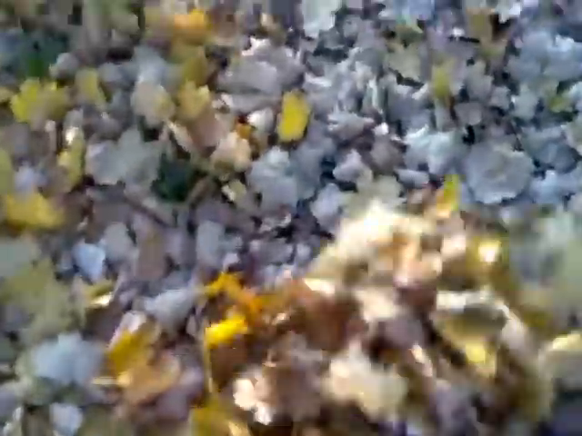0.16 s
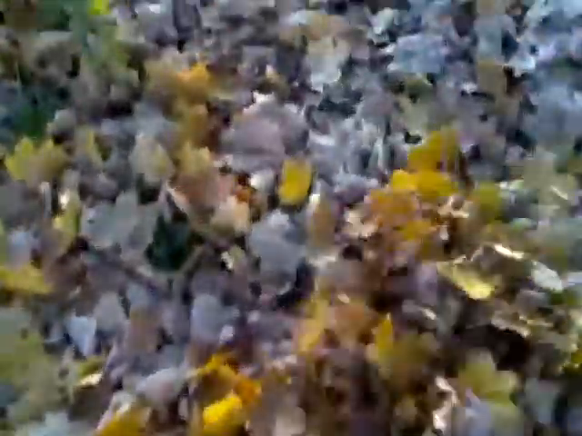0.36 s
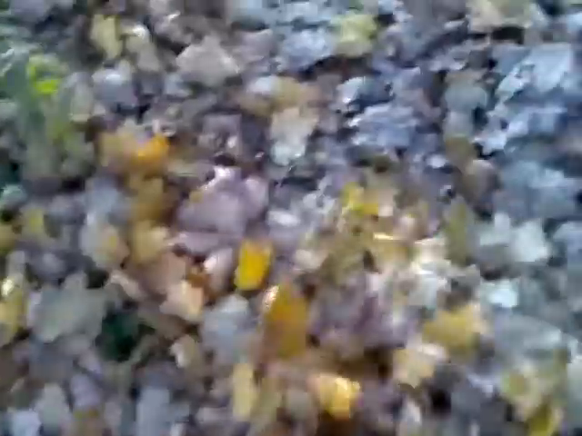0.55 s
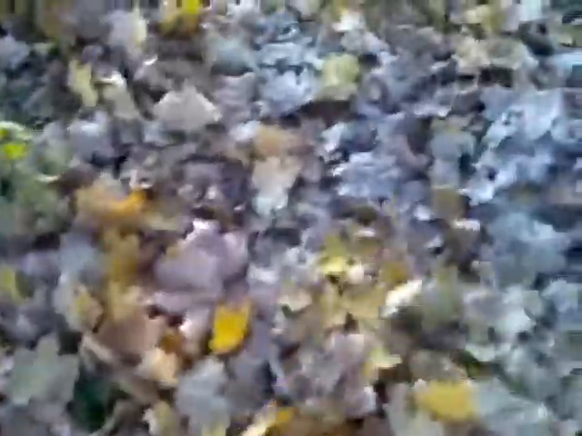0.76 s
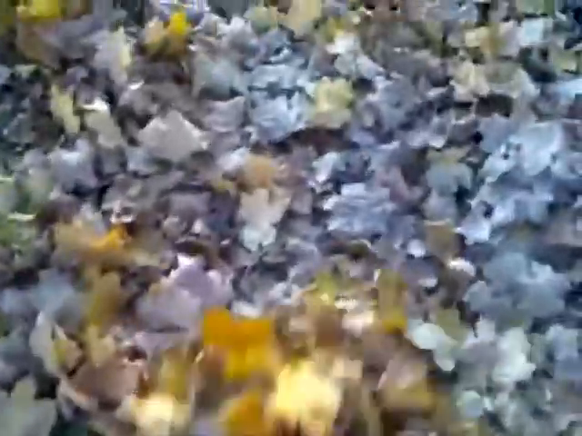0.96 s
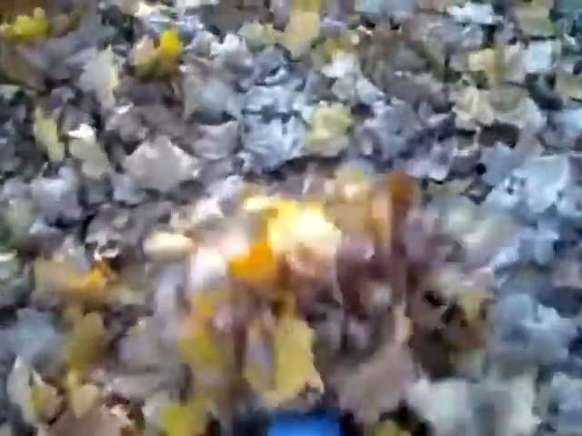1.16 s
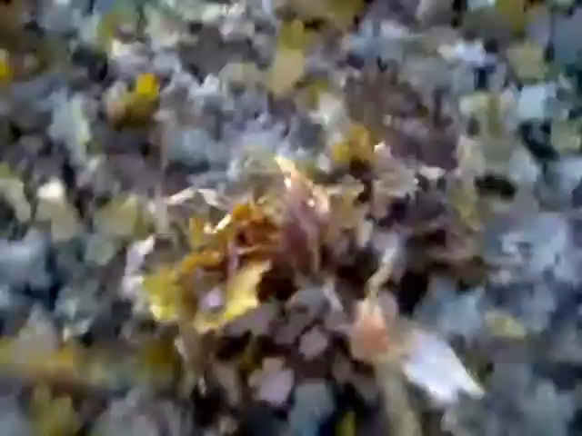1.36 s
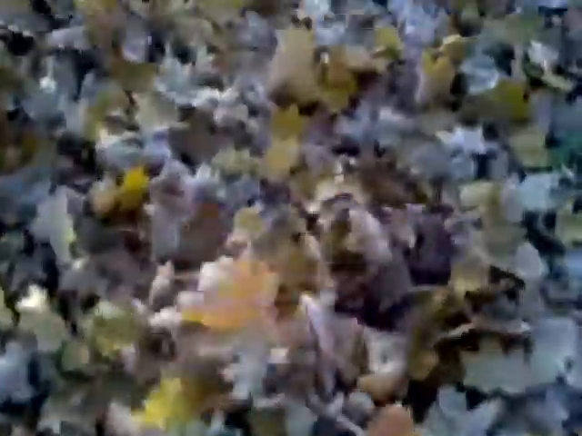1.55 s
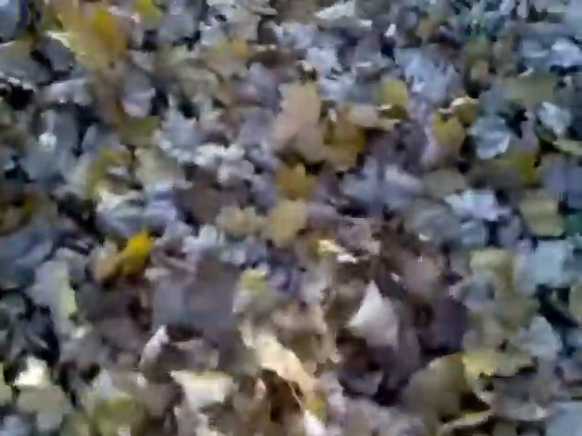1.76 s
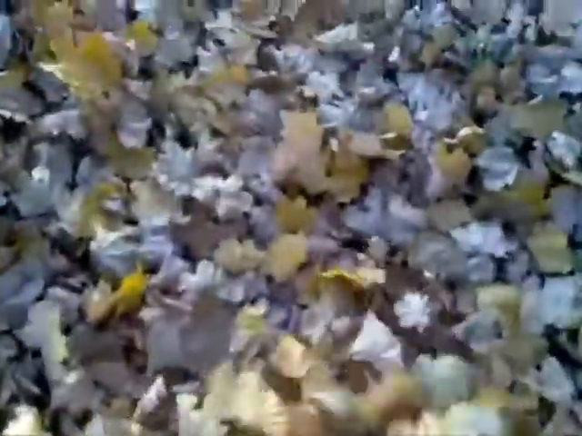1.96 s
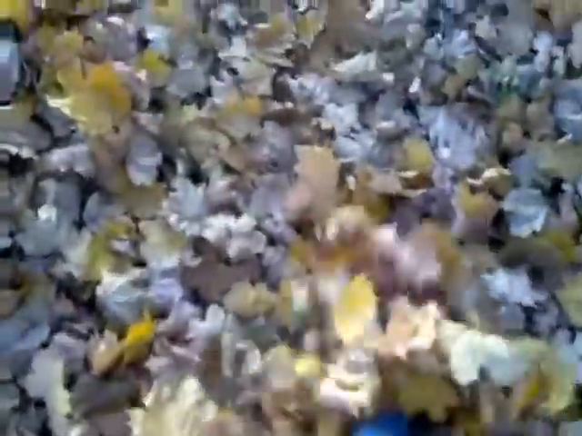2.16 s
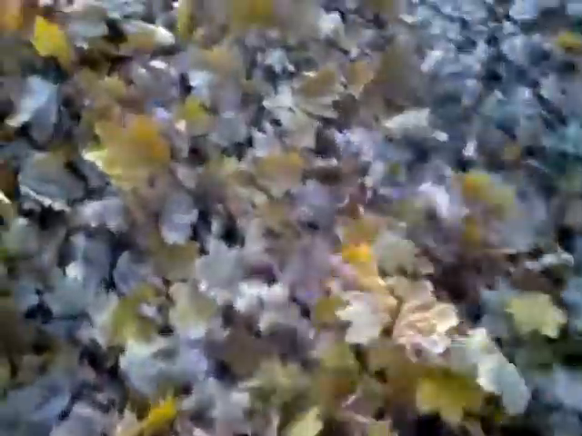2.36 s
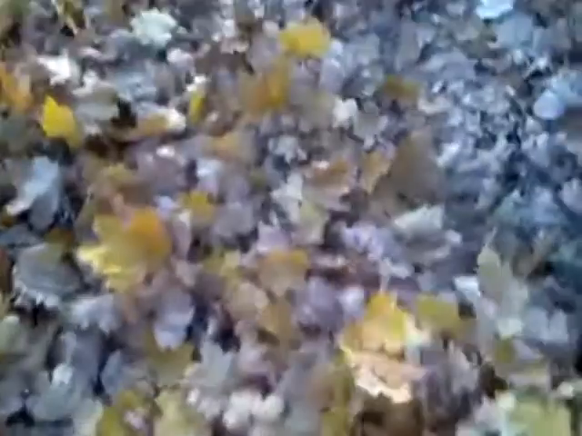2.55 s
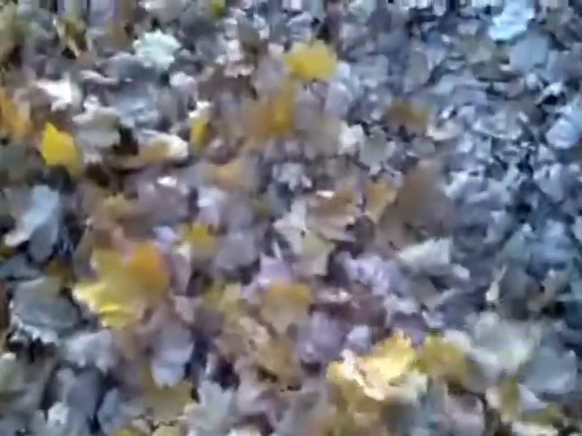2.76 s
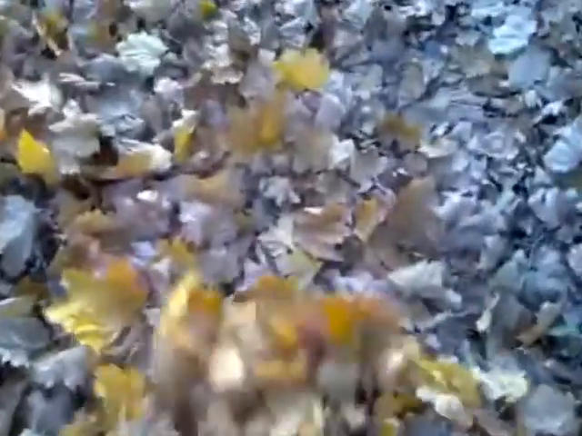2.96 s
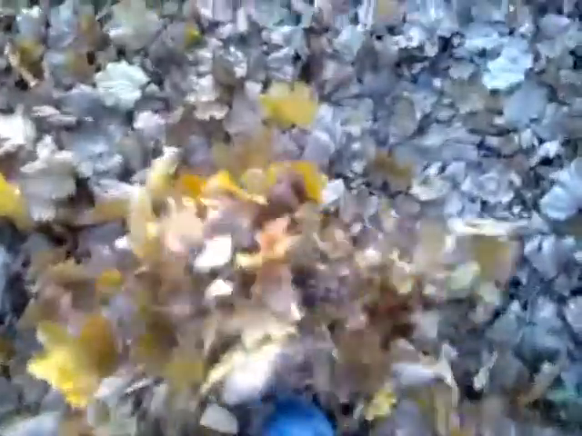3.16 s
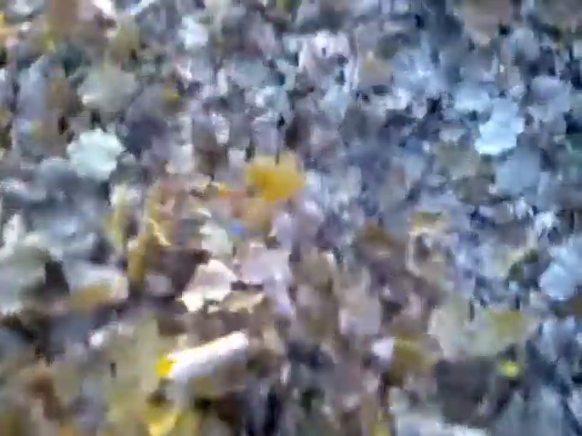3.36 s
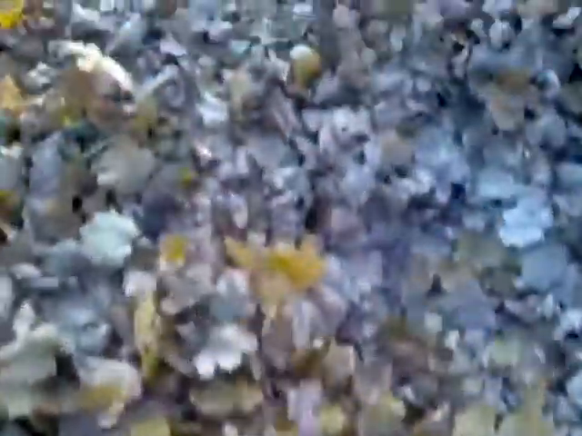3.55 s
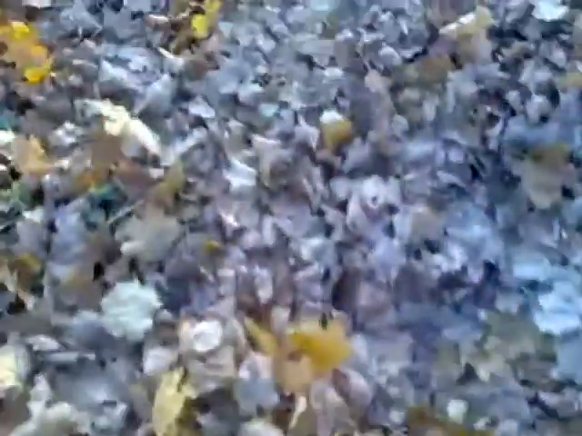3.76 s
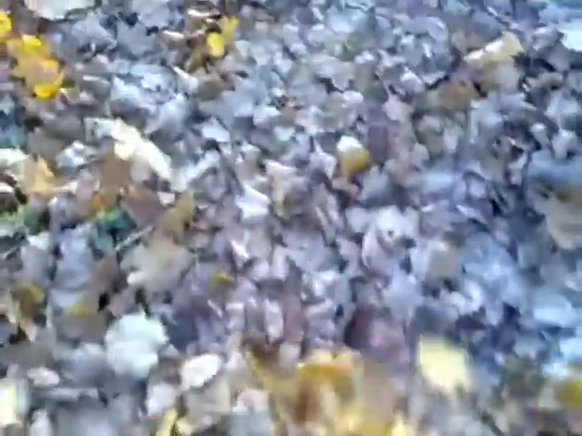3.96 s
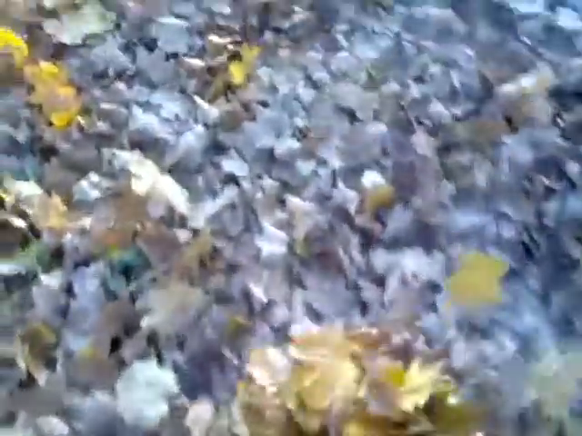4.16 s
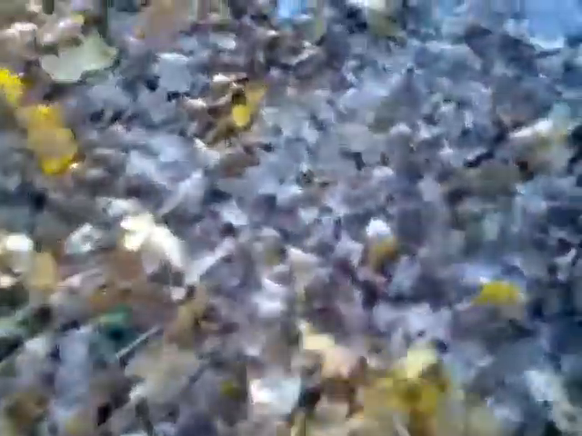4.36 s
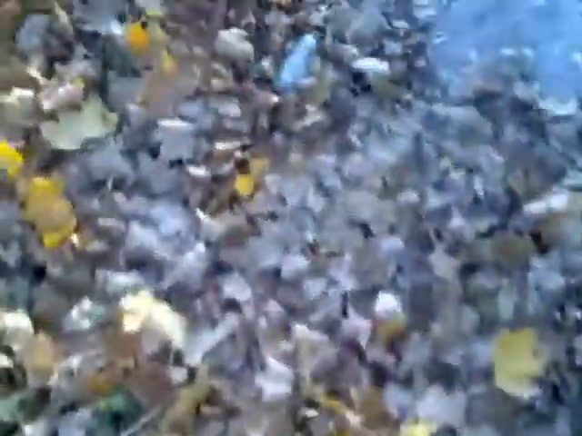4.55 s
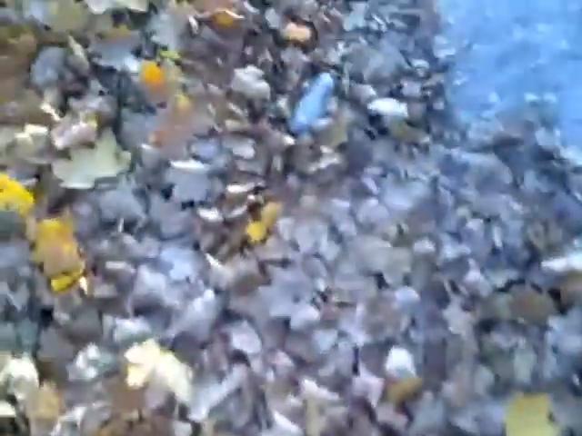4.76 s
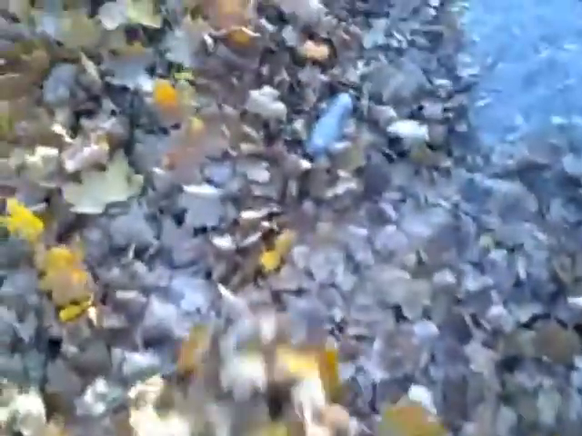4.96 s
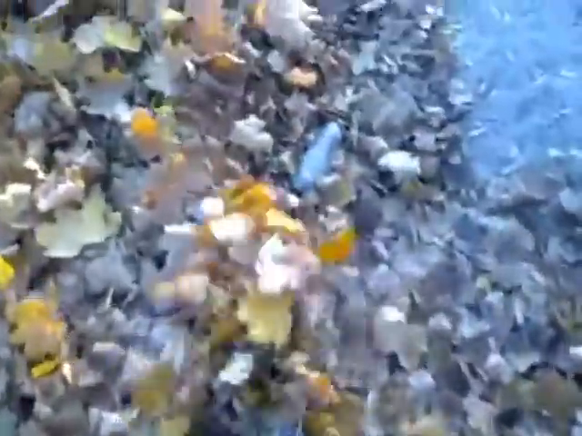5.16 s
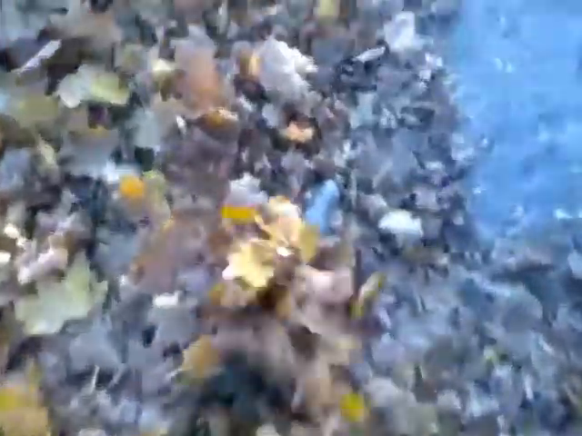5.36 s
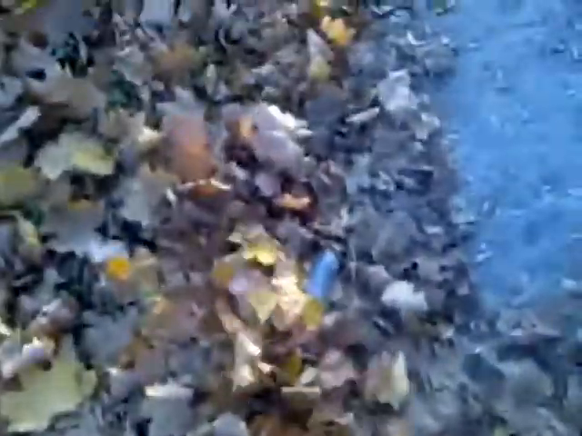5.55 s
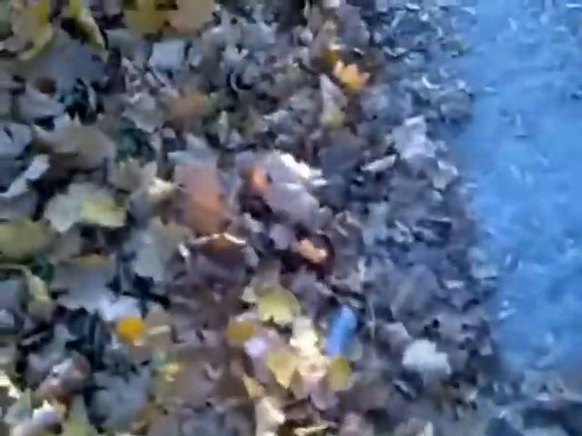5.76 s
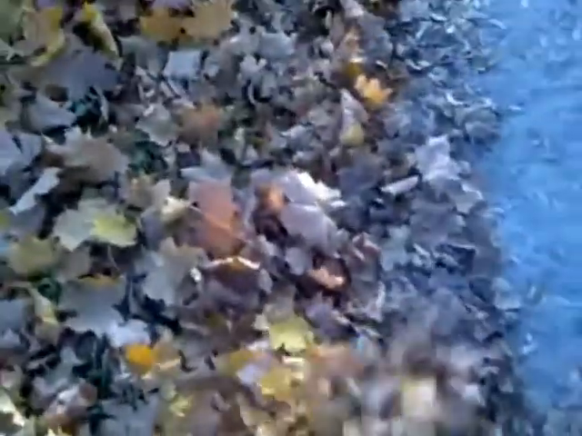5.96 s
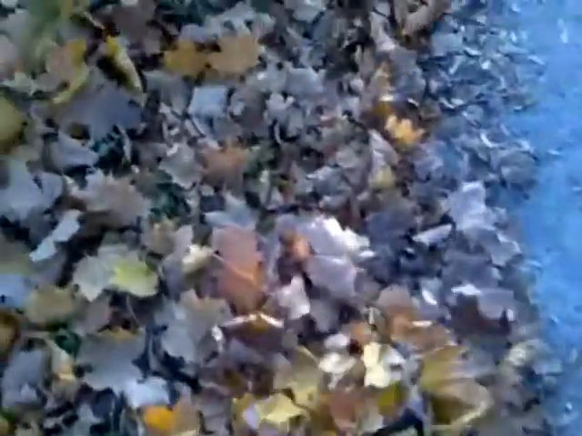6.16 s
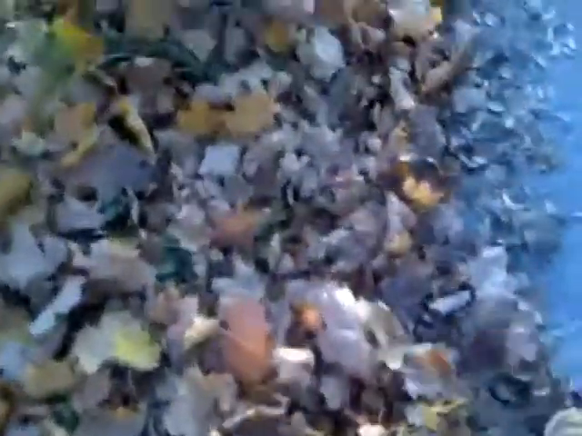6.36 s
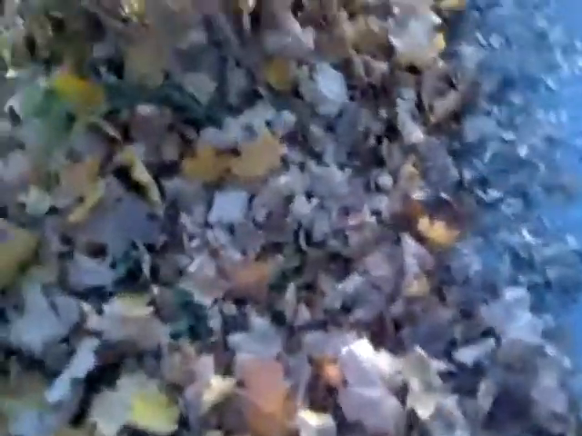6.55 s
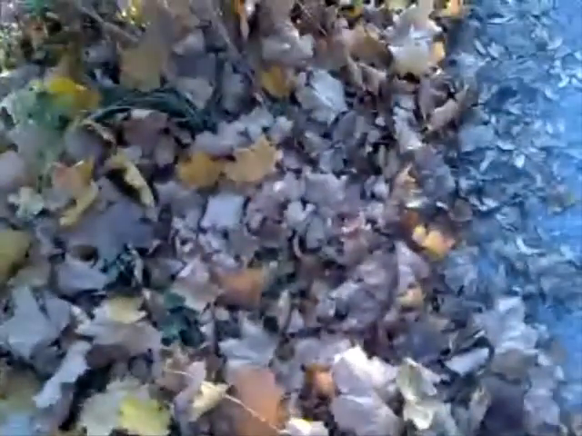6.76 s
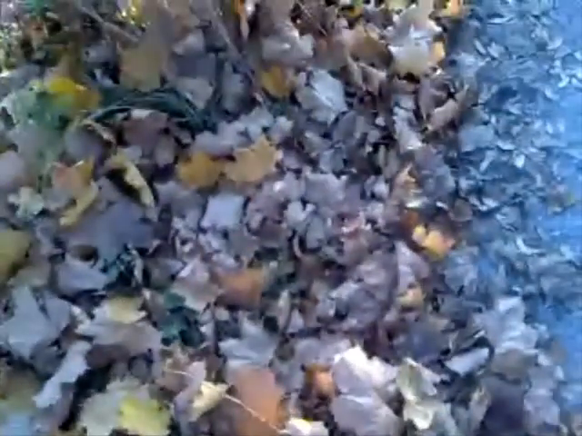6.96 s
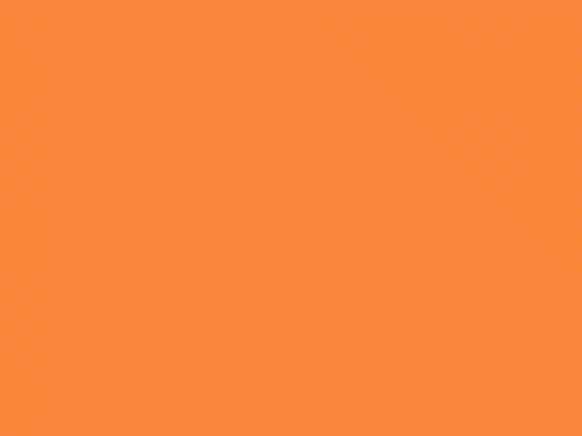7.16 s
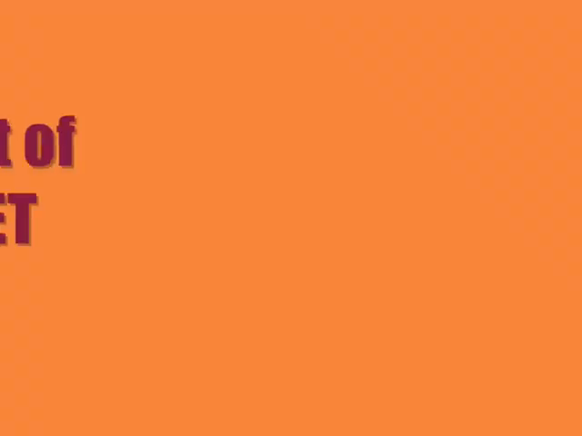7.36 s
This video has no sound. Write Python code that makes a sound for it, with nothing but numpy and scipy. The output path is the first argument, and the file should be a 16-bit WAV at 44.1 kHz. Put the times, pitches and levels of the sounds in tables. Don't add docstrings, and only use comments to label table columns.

```python
import sys
import numpy as np
from scipy import signal
from scipy.fft import rfft, irfft, next_fast_len
from scipy.io import wavfile
from scipy.ndimage import uniform_filter1d

SR = 44100
rng = np.random.default_rng(int(sys.argv[2]) if len(sys.argv) > 2 else 0)


def wav_record(signal):
    frames = np.transpose(np.atleast_2d(signal))
    bounded = np.clip(frames, -1, 1)
    quanta = np.round(bounded * 32767).astype(np.int16)
    wavfile.write(sys.argv[1], SR, quanta)


def volts_from_decibels(level):
    exponent = np.asarray(level, float) / 20
    return 10 ** exponent


N = 325893


def rms_one(x):
    return x / np.sqrt(np.mean(x ** 2) + 1e-20)


def in_time(rows):
    times, levels = np.transpose(rows)
    return np.interp(np.arange(N) / SR, times, levels)


def at_hz(points, hz):
    table_hz, values = np.transpose(points)
    return np.interp(np.log(hz), np.log(table_hz), values)


def band(x, low_hz, high_hz, order=2):
    return signal.sosfilt(signal.butter(order, [low_hz, high_hz], "band", fs=SR, output="sos"), x)


def drift(rate_hz):
    pole = np.exp(-16 * np.pi * rate_hz / SR)
    noise = rng.standard_normal(N // 8 + 4002)
    slow = signal.lfilter([1], [1, -2 * pole, pole * pole], noise)[4000:]
    return np.interp(np.arange(N) / 8, np.arange(len(slow)), rms_one(slow))


# (peak time [s], level [dB], swell over 10 dB [s], fade over 10 dB [s], brightness [dB])
FOOT_SWEEPS = [(0.003, -22, 0.03, 0.077, -4.5), (0.414, -20, 0.29, 0.43, 0), (0.904, -26, 0.12, 0.25, 1),
               (1.432, -19, 0.28, 0.37, 1.5), (1.993, -24.5, 0.16, 0.099, 1),
               (2.521, -21, 0.35, 0.225, 2.5), (2.732, -28, 0.038, 0.21, 2),
               (2.919, -22.5, 0.055, 0.19, 0.5), (3.39, -18.5, 0.25, 0.33, 1),
               (3.909, -23.5, 0.14, 0.098, 2), (4.349, -20.5, 0.27, 0.449, 0.5),
               (4.976, -31, 0.079, 0.076, 1), (5.349, -19, 0.22, 0.33, 2.5), (5.898, -22.5, 0.12, 0.095, 3),
               (6.388, -20, 0.25, 0.21, 2), (6.801, -29.5, 0.064, 0.054, 2),
               (6.91, -35.5, 0.033, 0.027, -1.5), (7.11, -34, 0.02, 0.28, -4)]
# (time [s], level [dB])
SETTLING_LEAVES = [
    (0, -30.5),
    (6.75, -32.5),
    (6.9, -34),
    (7.08, -40),
]


def sweeps():
    t = np.arange(N) / SR
    squareness = 2.54
    power = volts_from_decibels(2 * in_time(SETTLING_LEAVES))
    bright = -1.5 * power
    for peak_s, db, swell_s, fade_s, sweep_bright_db in FOOT_SWEEPS:
        distance = np.abs((t - peak_s) / np.where(t < peak_s, swell_s, fade_s))
        sweep = volts_from_decibels(2 * db - 20 * distance ** squareness)
        power = power + sweep
        bright = bright + sweep_bright_db * sweep
    level_db = 10 * np.log10(power)
    bright_db = bright / power
    slope = uniform_filter1d(np.gradient(level_db) * SR, round(0.03 * SR))
    rising = np.clip(slope, -99, 99)
    body_db = 0.017 * rising - 0.2 * bright_db
    edge_db = 0.55 * bright_db + 0.004 * rising
    crisp_db = bright_db - 0.027 * rising
    return level_db, body_db, edge_db, crisp_db


def cracks(per_s, spread_db):
    sizes = volts_from_decibels(spread_db * np.minimum(rng.exponential(1, N), 5))
    signs = rng.choice([-1, 1], N)
    return rms_one(sizes * signs * (rng.random(N) < per_s / SR))


# (frequency [Hz], level [dB per Hz])
LEAF_COLOUR = [(170, -39.5), (260, -21), (400, -15), (560, -6.5), (780, -8.5), (1400, -6), (2350, 0),
               (3100, -1.5), (3800, -4.5), (4900, -2.5), (5600, -6), (8200, -24), (13000, -32.5),
               (15500, -34)]
# (frequency [Hz], body share [1], dry edge share [1], crisp top share [1])
COLOUR_SHARES = [
    (1000, 1, 0, 0),
    (1900, 0, 0, 0),
    (3000, 0, 0, 0),
    (4600, 0, 1, 0),
    (6000, 0, 1, 0),
    (8500, 0, 0, 1),
]


def rustle(body_db, edge_db, crisp_db, per_s, spread_db, clump_db, patchy_db):
    trains = [cracks(per_s, spread_db) for _ in range(3)]
    clumps = clump_db * (0.13 * drift(14.0) + 0.52 * drift(35.0))
    regions = [drift(22.0) for _ in range(8)]
    tilts_db = [curve - np.mean(curve) for curve in (body_db, edge_db, crisp_db)]
    shares_table = np.array(COLOUR_SHARES)
    edges_hz = 150 * 2 ** (np.arange(22) / 3)
    out = 0
    for k, (low, high) in enumerate(zip(edges_hz, edges_hz[1:])):
        shares = [at_hz(shares_table[:, [0, c]], np.sqrt(low * high)) for c in (1, 2, 3)]
        octave, blend = k // 3, k % 3 * np.pi / 6
        patch = regions[octave] * np.cos(blend) + regions[octave + 1] * np.sin(blend)
        level_db = np.dot(shares, tilts_db) + clumps + patchy_db * patch
        out = out + volts_from_decibels(level_db) * band(trains[k % 3], low, high)
    size = next_fast_len(N)
    hz = np.maximum(np.arange(size // 2 + 1) * SR / size, 1)
    out = irfft(rfft(out, size) * volts_from_decibels(at_hz(LEAF_COLOUR, hz)), size)[:N]
    return out / np.sqrt(np.mean(band(out, 1350, 3650) ** 2))


def burst(length, decay_s):
    t = np.arange(length) / SR
    return rng.standard_normal(length) * np.exp(-t / decay_s) * (1 - np.exp(-t / 0.00046))


# (time [s], peak level [dB], pitch [Hz])
LEAF_SNAPS = [(0.0638, -15, 2380), (0.1565, -14, 2260), (0.2226, -9.5, 2200), (0.3192, -4, 2600),
              (0.4005, -11, 2910), (0.4836, -14, 2790), (0.607, -4.5, 2410), (0.6526, -10, 2760),
              (0.9677, -6, 2570), (1.4232, -2, 3000), (1.9285, -9, 2980), (1.9924, -7, 1930),
              (2.3225, -14, 2260), (2.4169, -7, 4580), (2.7237, -4, 2690), (2.9024, -4.5, 2680),
              (3.111, -12, 2480), (3.208, -6, 2380), (3.237, -6.5, 2710), (3.464, -17, 1940),
              (3.6157, -3, 3350), (3.8282, -9, 2730), (3.9195, -18, 2120), (4.372, -19, 2750),
              (4.4209, -10, 2840), (5.417, -8, 2430), (5.8341, -8, 2980), (6.393, -7.5, 4800),
              (6.4408, -8, 4770), (6.7241, -10, 2750)]


def snaps(boost_db, decay_s, width):
    out = np.zeros(N)
    for s, peak_db, hz in LEAF_SNAPS:
        piece = band(burst(900, decay_s), hz / width, hz * width)
        out[round(s * SR):][:900] += volts_from_decibels(peak_db + boost_db) * piece / np.abs(piece).max()
    return out


# (time [s], peak level [dB], first ring [Hz], later ring [Hz], length [ms])
FINGER_SLIPS = [
    (6.812, -4, 1720, 1440, 0.68),
    (6.8863, -1, 4740, 3270, 0.94),
    (6.928, 1, 2740, 1930, 0.88),
    (6.9703, -0.5, 4480, 2270, 0.73),
    (7.0136, -15.5, 1890, 1150, 3.6),
]


def casing(tail_db, tail_s):
    out = np.zeros(N)
    t = np.arange(1300) / SR
    for s, peak_db, first_hz, later_hz, length_ms in FINGER_SLIPS:
        rattle_db = -26 if s == FINGER_SLIPS[0][0] else -4.5
        swell = t / (length_ms / 2000)
        first = np.sin(2 * np.pi * first_hz * t) * swell ** 2 * np.exp(2 - 2 * swell)
        later = np.sin(2 * np.pi * later_hz * t * np.exp(-t * 60))
        later = later * (swell / 1.59) ** 2 * np.exp(2 - 2 * swell / 1.4)
        onset = volts_from_decibels(rattle_db) * swell * np.exp(1 - swell)
        tail = volts_from_decibels(tail_db) * np.exp(-t / tail_s) * np.minimum(swell, 1)
        rattle = band(rng.standard_normal(len(t)), 720, 5300, order=4) * (onset + tail)
        out[round(s * SR):][:len(t)] += volts_from_decibels(peak_db) * (rattle - first - volts_from_decibels(-1.5) * later)
    return band(out, 450, 7000, order=3)


# (time [s], peak level [dB])
SOLE_THUDS = [
    (.28, -59.5),
    (1.09, -70),
    (2.92, -60),
    (3.02, -62),
    (3.72, -66),
    (6.06, -75),
]


def thuds(hz, length_s):
    out = np.zeros(N)
    t = np.arange(round(length_s * SR)) / SR
    push = np.sin(2 * np.pi * hz * t) * np.sin(np.pi * t / length_s) ** 2
    for s, peak_db in SOLE_THUDS:
        out[round(s * SR):][:len(t)] += volts_from_decibels(peak_db) * push
    return out


# (time [s], level [dB])
GRIP_RUMBLE = [
    (6.74, -95),
    (6.80, -56),
    (6.83, -44.5),
    (6.87, -80),
    (6.93, -65.5),
    (6.99, -81),
    (7.05, -80),
    (7.12, -63),
    (7.21, -64),
]


def grip():
    return volts_from_decibels(in_time(GRIP_RUMBLE)) * rms_one(band(rng.standard_normal(N), 35, 130))


def scene():
    rustle_db, *tilts_db = sweeps()
    leaves = volts_from_decibels(rustle_db) * rustle(*tilts_db, per_s=6000, spread_db=2.5, clump_db=0.75, patchy_db=1.0)
    leaves = signal.sosfilt(signal.butter(10, 185, "high", fs=SR, output="sos"), leaves)
    mono = leaves + snaps(boost_db=-5.5, decay_s=0.003, width=1.4)
    mono = mono + casing(tail_db=-5.5, tail_s=0.0032)
    mono = mono + thuds(hz=155, length_s=0.078) + grip()
    return np.array([mono, mono])


def top_cut(x):
    return signal.sosfilt(signal.butter(12, 15720, fs=SR, output="sos"), x)


def record(dry):
    sag = signal.sosfilt(signal.butter(10, 60, fs=SR, output="sos"), np.minimum(np.abs(dry), 0.2))
    x = np.clip(dry - volts_from_decibels(-42) * sag, -0.9, 0.9)
    start, cut = round(7.146 * SR), round(7.2175 * SR)
    buffer = 2048
    again = np.arange(cut - start) % buffer + start - buffer
    x[:, start:cut] = x[:, again] + 0.3 * x[:, start:cut]
    after_s = np.arange(N - cut) / SR
    x[:, cut:] *= volts_from_decibels(-40 - 60 * after_s / 0.53)
    x = signal.sosfilt(signal.cheby2(12, 60, 16000, fs=SR, output="sos"), x)
    return top_cut(x)


dry = scene()
out = record(dry)
wav_record(out)
```